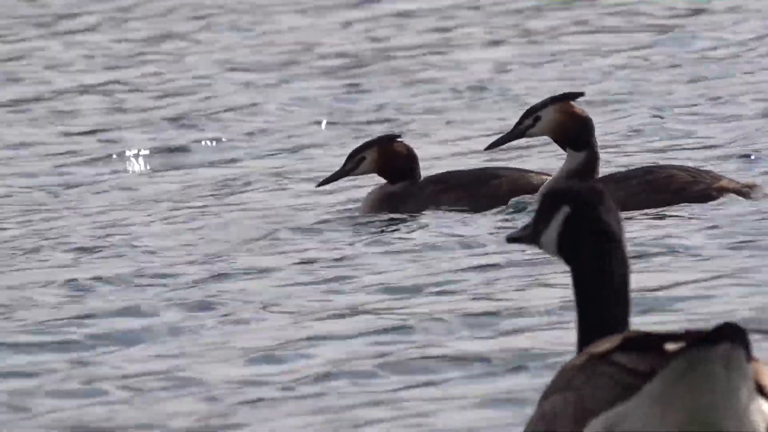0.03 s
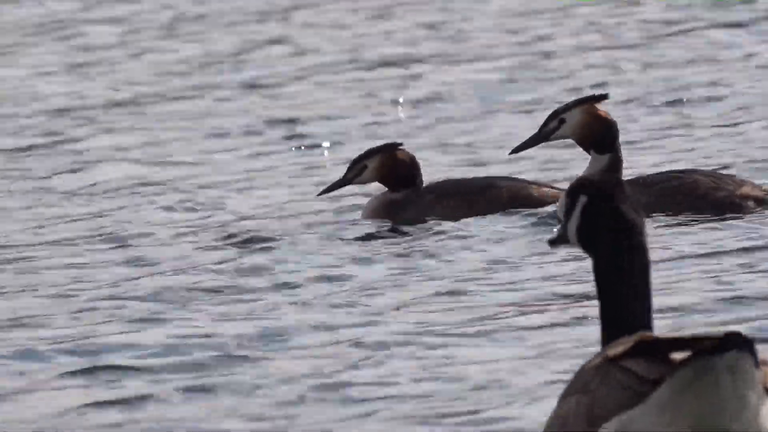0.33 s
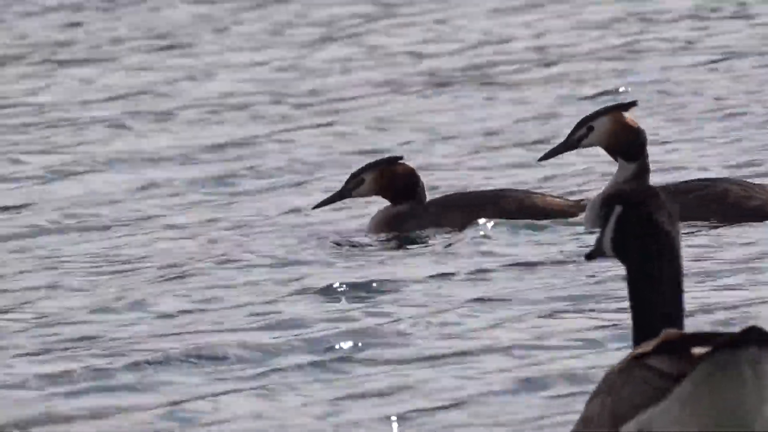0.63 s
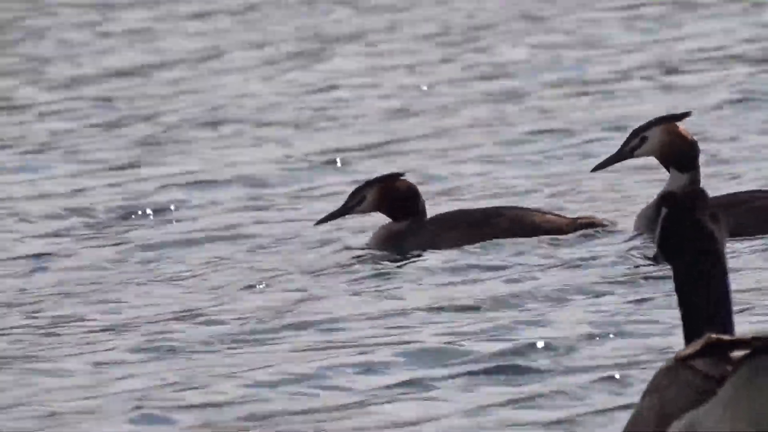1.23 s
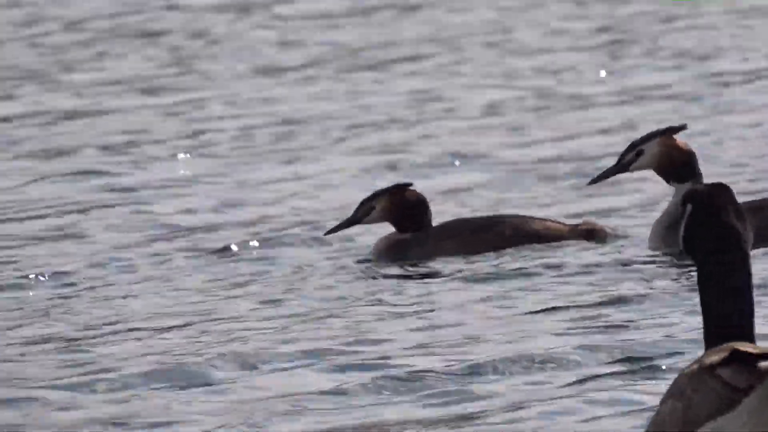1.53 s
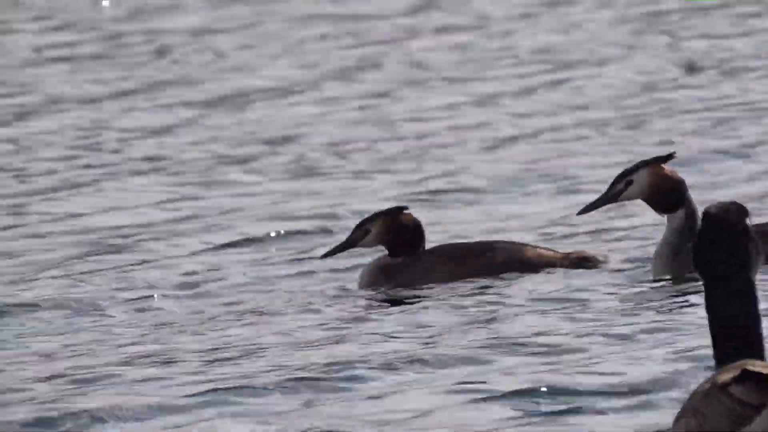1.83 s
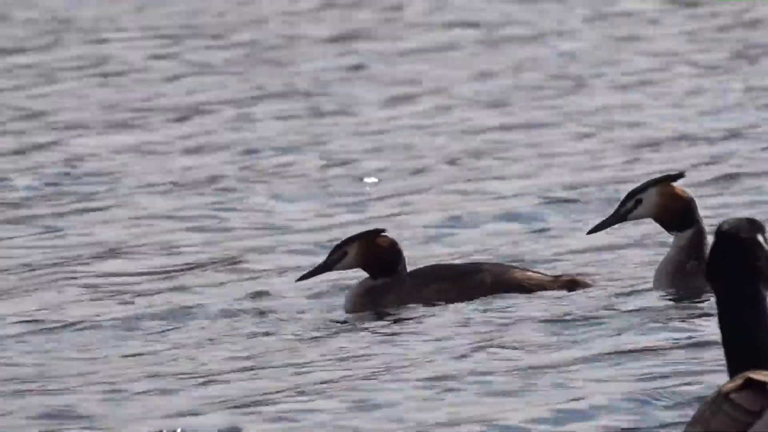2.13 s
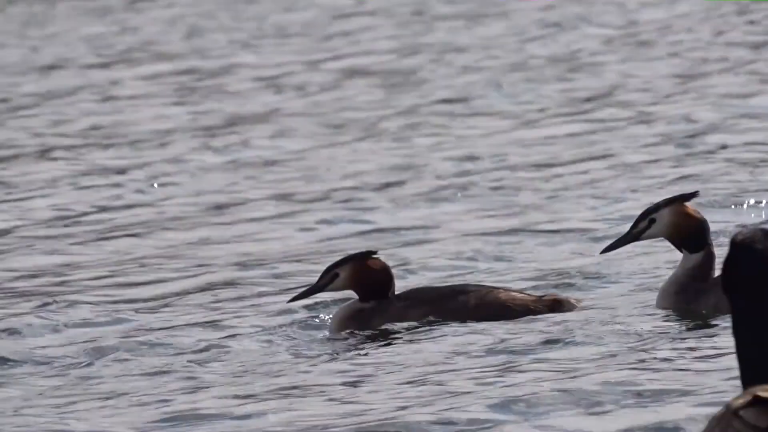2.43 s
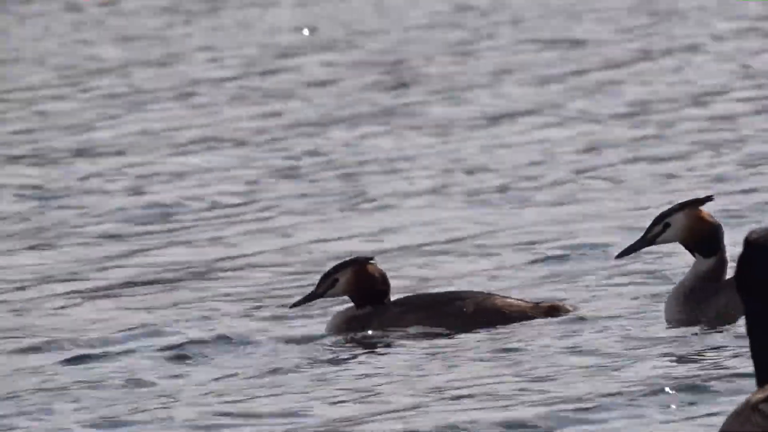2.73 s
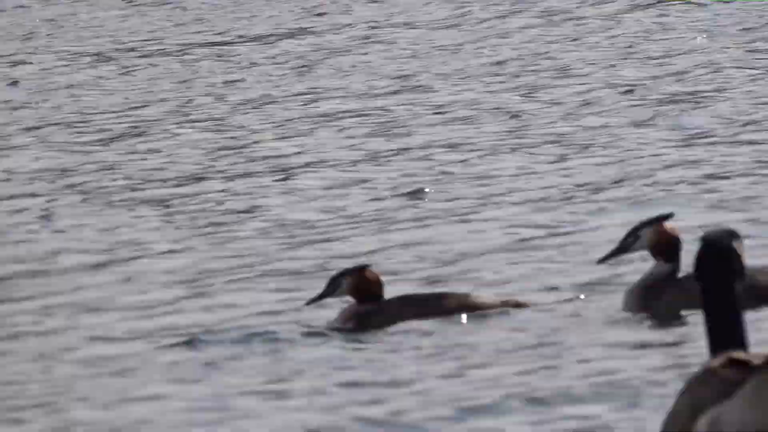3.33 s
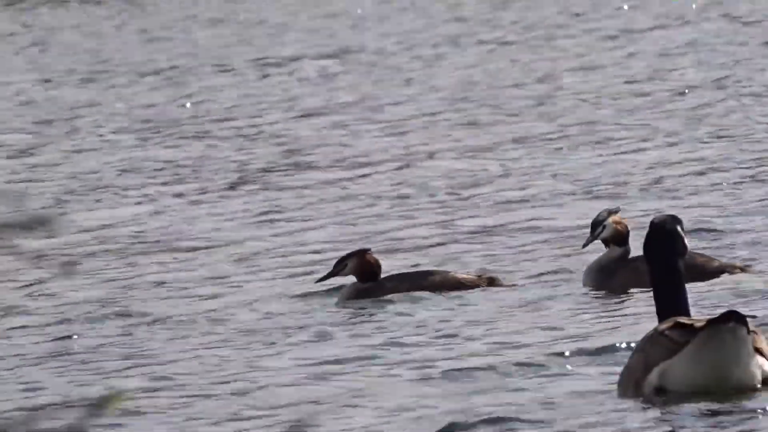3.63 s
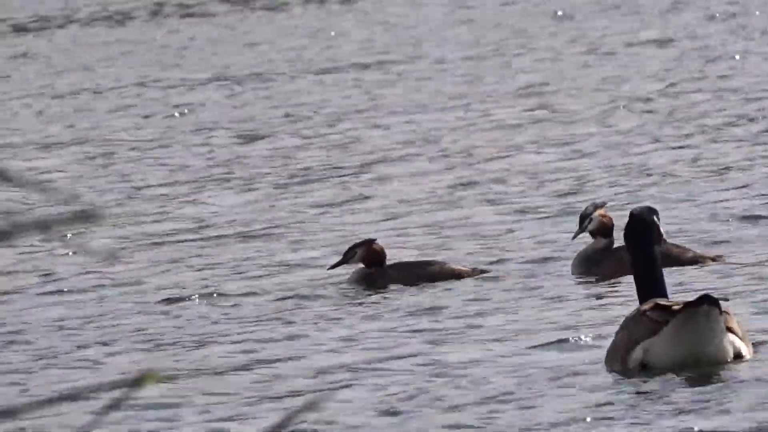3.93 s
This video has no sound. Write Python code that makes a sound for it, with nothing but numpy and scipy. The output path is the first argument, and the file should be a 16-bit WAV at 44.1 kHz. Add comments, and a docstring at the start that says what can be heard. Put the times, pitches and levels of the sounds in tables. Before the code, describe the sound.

Songbirds give quick chirps, thin high calls and a distant trill along a wooded lake shore over light wind. Later a close camera lens clicks, knocks and whirs in two runs while the birds keep singing.

```python
"""Small birds sing in the trees on a lake shore: whistles, warbles, thin high calls, quick downward
slides, a far trill and faint chirps. Each note is a nearly pure gliding tone, scattered by the wood.
A camera's zoom motor whirs in two runs as gear friction rings the lens housing; it clicks and knocks.
A faint wind rumbles over the water."""
import sys
import numpy as np
from scipy import signal
from scipy.fft import rfft, irfft, next_fast_len
from scipy.io import wavfile
from scipy.ndimage import map_coordinates

SR = 44100
rng = np.random.default_rng(int(sys.argv[2]) if len(sys.argv) > 2 else 0)


def wav_out(sig):
    """Save sig, one row per channel (or a flat mono array), as 16-bit PCM at SR to the path in sys.argv[1]."""
    wavfile.write(sys.argv[1], SR, np.round(np.clip(np.atleast_2d(sig).T, -1, 1) * 32767).astype(np.int16))


N = 176400

# echo decay of the wood: freq_hz, t60_s
WOOD_DECAY = [(2000, 0.57), (4000, 0.39), (8000, 0.41)]
CLEAR_WAVER, ROUGH_WAVER = 0.008, 0.021  # fractions of pitch


def whistles(echo_db=-3.5):
    """Clear, nearly level notes."""
    # start_s, length_s, start_hz, middle_hz, end_hz, level_db
    notes = [(0.026, 0.075, 6150, 5870, 6120, -56), (0.239, 0.11, 3350, 3170, 3113, -53.5),
             (0.683, 0.045, 2870, 2937, 2910, -51), (1.324, 0.1, 5670, 5130, 5190, -47),
             (1.831, 0.051, 3493, 3440, 3450, -31), (1.869, 0.057, 4110, 4025, 4070, -39),
             (1.875, 0.16, 2487, 2430, 2420, -54.5), (1.983, 0.11, 3940, 3804, 3870, -46.5),
             (1.999, 0.1, 3440, 3435, 3434, -47.5), (2.654, 0.064, 4380, 4185, 4020, -40),
             (2.673, 0.066, 3464, 3393, 3204, -38.5), (2.738, 0.0764, 3395, 3364, 3494, -34.5),
             (2.809, 0.21, 4510, 4810, 4440, -46), (2.996, 0.065, 3600, 3395, 3446, -36.5),
             (3.067, 0.1, 3400, 3338, 3397, -43.5), (3.172, 0.14, 2250, 2350, 2350, -54.5),
             (3.71, 0.08, 2267, 2403, 2450, -51), (3.839, 0.054, 2272, 2436, 2445, -40),
             (3.896, 0.043, 3550, 3640, 3970, -39), (3.915, 0.1, 2440, 2397, 2410, -39)]
    return song([(*row, echo_db) for row in notes], CLEAR_WAVER)


def warbles(echo_db=2):
    """Straight glides with a rough pitch, from deeper in the trees."""
    # start_s, length_s, start_hz, end_hz, level_db
    glides = [(0, 0.042, 4340, 4000, -49.5), (0.538, .042, 4700, 6050, -56.5),
              (0.712, 0.081, 3430, 4490, -52), (1.002, 0.054, 4020, 3476, -54.5),
              (1.129, 0.059, 3230, 4130, -52.5), (1.394, .13, 2980, 2396, -58.5),
              (1.627, .03, 4400, 3770, -42), (1.67, 0.062, 3150, 2667, -51.5),
              (2.17, 0.062, 3980, 3716, -51), (2.394, 0.096, 4410, 3715, -50.5),
              (2.92, 0.057, 3240, 2610, -56.5), (3.877, .02, 3550, 3664, -37)]
    notes = [(start_s, length_s, start_hz, (start_hz + end_hz) / 2, end_hz, level_db, echo_db)
             for start_s, length_s, start_hz, end_hz, level_db in glides]
    return song(notes, ROUGH_WAVER)


def thin_calls(rasp=0.026, short_s=0.046):
    """High swelling calls; short ones are raspy, longer ones purer."""
    # start_s, length_s, start_hz, middle_hz, end_hz, level_db, echo_db
    calls = [(0.075, 0.052, 7620, 7080, 5550, -52, 3.5), (0.599, 0.041, 5900, 7200, 6150, -48, 3.5),
             (0.849, 0.11, 7840, 7640, 7070, -51, 2), (1.022, 0.084, 7570, 7420, 6910, -49.5, 3.5),
             (1.231, 0.058, 6760, 8190, 6600, -55, 16.5), (1.472, .05, 7600, 8100, 8700, -64, 13),
             (2.172, 0.0604, 7930, 7760, 7620, -39.5, 3.5), (2.269, 0.07, 7200, 6820, 6450, -52, 6.5),
             (2.34, 0.048, 7750, 7780, 7350, -34.5, 1.5), (2.542, 0.04, 7880, 7850, 7250, -34, 4)]
    return sum(song([row], waver=rasp * min(1, short_s / row[1]) ** 2, swell_db=13) for row in calls)


def slides(base_s=0.01093, fall_hz_per_s=89000, sag=0.64, echo_db=-1.5):
    """Quick slides that fall fast, then level off; wider ones take longer."""
    # start_s, top_hz, bottom_hz, level_db
    falls = [(0.857, 5730, 3350, -55), (.978, 5900, 4140, -59), (1.125, 5700, 3800, -56),
             (1.314, 5330, 3390, -47.5), (1.621, 5000, 3450, -36.5), (1.656, 3780, 3290, -33.5),
             (1.684, 3930, 3630, -35), (1.728, 4184, 3270, -33.5), (1.787, 3620, 3170, -37.5),
             (1.948, 3565, 3270, -36), (1.955, 5670, 3900, -52), (2.108, 5840, 3750, -59),
             (2.26, 5960, 4360, -54), (2.566, 5870, 3900, -53)]
    notes = []
    for start_s, top_hz, bottom_hz, level_db in falls:
        drop_hz = top_hz - bottom_hz
        length_s = base_s + drop_hz / fall_hz_per_s
        notes.append((start_s, length_s, top_hz, top_hz - sag * drop_hz, bottom_hz, level_db, echo_db))
    return song(notes, CLEAR_WAVER)


def trill(count=10, first_s=1.456, step_s=0.078, level_db=-42.5, fade_db=9, direct_db=-7):
    """A far bird repeats one falling note, heard mostly through the trees."""
    out = np.zeros((2, N))
    for k in range(count):
        start_s = first_s + k * step_s
        tone = note(length_s=0.04, start_hz=5960, middle_hz=5306, end_hz=3810, waver=ROUGH_WAVER)
        tone *= amp(level_db - np.linspace(0, fade_db, len(tone)))
        add(out, start_s, amp(direct_db) * tone)
        add(out, start_s, wood_echo(tone, t60_s=0.35))
    return out


def chorus(count=44, centre_hz=3957, spread=0.27, glide=0.086, length_s=0.071, level_db=-62):
    """Faint random chirps from far along the shore, heard only as echo."""
    out = np.zeros((2, N))
    for k, (late, high, bend, loud) in enumerate(rng.standard_normal((count, 4))):
        start_s = (k + late / 2) / count * N / SR
        pitch_hz = centre_hz * np.exp(spread * high)
        contour_hz = pitch_hz * (1 + glide * bend * np.array([1, 0, -0.5]))
        tone = note(length_s, *contour_hz, CLEAR_WAVER)
        add(out, start_s, amp(level_db + 2 * loud) * wood_echo(tone, log_interp(WOOD_DECAY, pitch_hz)))
    return out


def song(notes, waver, swell_db=0):
    """Each note arrives directly and through the trees."""
    out = np.zeros((2, N))
    for start_s, length_s, start_hz, middle_hz, end_hz, level_db, echo_db in notes:
        tone = note(length_s, start_hz, middle_hz, end_hz, waver)
        tone *= amp(level_db + swell_db * np.linspace(-0.5, 0.5, len(tone)))
        add(out, start_s, tone)
        add(out, start_s, amp(echo_db) * wood_echo(tone, log_interp(WOOD_DECAY, middle_hz)))
    return out


def note(length_s, start_hz, middle_hz, end_hz, waver):
    """A fluttering tone bent through three pitches; only the highest notes carry an octave."""
    attack_s, release_s, flutter_db = 0.0039, 0.0051, 4
    t = np.arange(int(length_s * SR)) / SR
    pitch_hz = np.polyval(np.polyfit([0, 0.5, 1], [start_hz, middle_hz, end_hz], 2), t / t[-1])
    pitch_hz *= 1 + waver * wobble(600, len(t))
    phase = 2 * np.pi * np.cumsum(pitch_hz) / SR
    gate = np.clip(t / attack_s, 0, 1) * np.clip((t[-1] - t) / release_s, 0, 1)
    flutter = unit_rms(amp(flutter_db * wobble(72.3, len(t))))
    octave = (middle_hz > 7000) * amp(-27) * np.sin(2 * phase)
    return np.sin(gate * np.pi / 2) * flutter * (np.sin(phase) + octave)


def wood_echo(tone, t60_s, build_s=0.0016):
    """Diffuse echo off the trees, with the note's own energy per channel."""
    t = np.arange(SR // 2) / SR
    envelope = amp(-60 * t / t60_s) * (1 - np.exp(-t / build_s))
    impulse = envelope * stereo(rng.standard_normal((2, len(t))), width=0.22)
    echo = signal.fftconvolve(tone[None], impulse, axes=1)
    return echo * np.sqrt(2 * np.sum(tone ** 2) / np.sum(echo ** 2))


def zoom_motor(level_db=-45, hiss_db=-22, gear_hz=98.2, gear_depth=0.25, ramp_s=0.0013, unsteady_db=1.2):
    """Gear friction, pulsing with the shaft, rings the lens housing."""
    # start_s, stop_s
    runs = [(2.672, 3.714), (3.845, 4.1)]
    # housing resonances: freq_hz, width_hz, gain_db
    modes = [(672, 75, 3), (1230, 140, -8), (1890, 240, -0.5), (3650, 240, -10), (4600, 250, -6),
             (6900, 600, -13.5), (8300, 480, -10.5), (9850, 500, -18), (11800, 550, -15),
             (15400, 700, -14.5)]

    def housing(hz):
        power = sum(amp(gain_db) ** 2 / (1 + 2 * ((hz - freq_hz) / width_hz) ** 2) ** 2
                    for freq_hz, width_hz, gain_db in modes)
        return np.sqrt(amp(hiss_db) ** 2 + power)

    t = np.arange(N) / SR
    gate = sum(np.clip(np.minimum(t - start_s, stop_s - t) / ramp_s, 0, 1) for start_s, stop_s in runs)
    turns = np.cumsum(gear_hz * (1 + 0.022 * wobble(15))) / SR
    pulsing = 1 + gear_depth * signal.sawtooth(2 * np.pi * turns, 0)
    friction = pulsing * stereo(rng.standard_normal((2, N)), width=0.5)
    return gate * amp(level_db + unsteady_db * wobble(24.77)) * unit_rms(filtered(friction, housing))


def camera_clicks(tick_hz=8400, rise_s=0.00069, tick_t60_s=0.0061, knock_s=2.837, knock_db=-30.5):
    """Sharp plastic ticks and a dull knock of the lens."""
    # start_s, level_db
    ticks = [(2.701, -33), (2.833, -22.5)]
    # freq_hz, gain_db, t60_s
    knock_modes = [(263, -5, 0.038), (446, 7.5, 0.011), (730, -6, .05)]
    out = np.zeros(N)
    t = np.arange(SR // 10) / SR
    envelope = (1 - np.exp(-t / rise_s)) * amp(-60 * t / tick_t60_s)
    envelope /= envelope.max()
    for start_s, level_db in ticks:
        tick = np.sin(2 * np.pi * tick_hz * t) + 0.46 * rng.standard_normal(len(t))
        add(out, start_s, amp(level_db) * envelope * tick)
    for freq_hz, gain_db, t60_s in knock_modes:
        add(out, knock_s, amp(knock_db + gain_db - 60 * t / t60_s) * np.sin(2 * np.pi * freq_hz * t))
    return out


def wind(gust_db=2.0, air_db=-50.5):
    """A low uneven rumble under the steady hush of open air."""
    # time_s, level_db
    rumble_levels = [(0, -44.5), (2.2, -40.5), (4, -41)]
    # freq_hz, density_db
    rumble_spectrum = [(20, -7), (43, 0.5), (90, 0.5), (136, -3.5), (200, -13), (350, -21.5), (700, -51.5)]
    # freq_hz, density_db
    air_spectrum = [(250, -0.5), (680, 6), (1050, -1.5), (1900, -9), (3000, -7), (4500, -10.5),
                    (6200, -14.5), (8500, -23.5), (15500, -18.5)]
    rumble_db = np.interp(np.arange(N) / SR, *np.transpose(rumble_levels)) + gust_db * wobble(14)
    return amp(rumble_db) * air_noise(rumble_spectrum) + amp(air_db) * air_noise(air_spectrum)


def air_noise(spectrum):
    """Coloured stereo noise of rms 1, widest in the midrange."""
    # left-right likeness: freq_hz, correlation
    likeness = [(100, 0.98), (300, 0.6), (1000, 0.04), (5000, 0.43), (12000, 0.91)]

    def colour(hz):
        angle = np.arccos(np.clip(log_interp(likeness, hz), -1, 1)) / 2
        return amp(log_interp(spectrum, hz)) * [np.cos(angle), np.sin(angle)]

    mid_side = filtered(rng.standard_normal((2, N)), colour)
    return unit_rms(stereo(mid_side, width=1))


def amp(db):
    """Decibels to gain."""
    return 10 ** (np.asarray(db) / 20)


def unit_rms(x):
    """Scale to rms 1."""
    return x / np.sqrt(np.mean(x ** 2) + 1e-20)


def log_interp(points, hz):
    """Interpolate (freq_hz, value) points on a log frequency axis."""
    freq_hz, values = np.transpose(points)
    return np.interp(np.log(hz + 1), np.log(freq_hz + 1), values)


def wobble(knots_per_s, size=N):
    """Smooth random curve."""
    return map_coordinates(rng.standard_normal(4096), [np.arange(size) * knots_per_s / SR], mode="wrap")


def filtered(x, response):
    """Apply the gain response(hz)."""
    size = next_fast_len(N + SR // 2)
    return irfft(rfft(x, size) * response(np.fft.rfftfreq(size, 1 / SR)), size)[..., :N]


def add(track, start_s, x):
    """Mix x into the track."""
    i = max(0, round(start_s * SR))
    track[..., i:i + x.shape[-1]] += x[..., :max(0, N - i)]


def stereo(mid_side, width):
    """Mid and side to left and right."""
    mid, side = mid_side
    return np.array([mid + width * side, mid - width * side])


def scene():
    """Birds a little to the right, wind all round, the motor at the microphone."""
    # freq_hz, left_minus_right_db
    bird_pan = [(2400, 1.5), (3400, -5), (5000, -0.2)]
    birds = whistles() + warbles() + thin_calls() + slides() + trill() + chorus()
    birds = filtered(birds, lambda hz: amp(np.outer([0.5, -0.5], log_interp(bird_pan, hz))))
    return birds + wind() + zoom_motor() + camera_clicks()


def record(dry):
    """The camera's band limit."""
    top_hz = 15850
    return filtered(dry, lambda hz: hz < top_hz)


dry = scene()
out = record(dry)
wav_out(out)
```